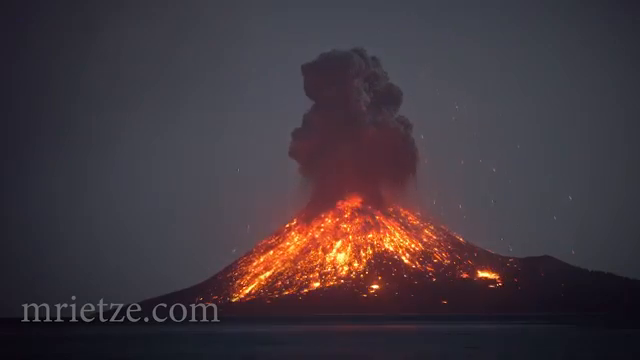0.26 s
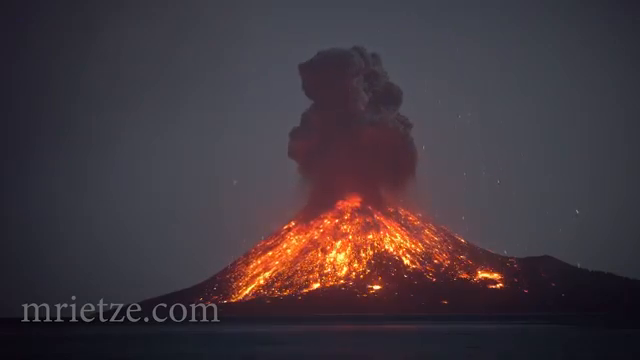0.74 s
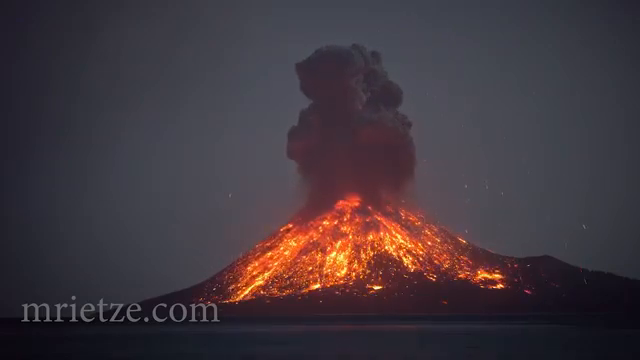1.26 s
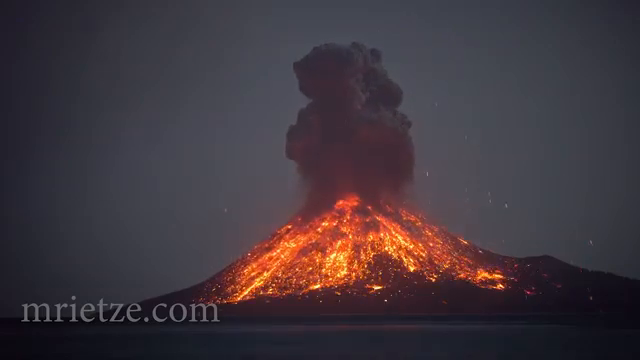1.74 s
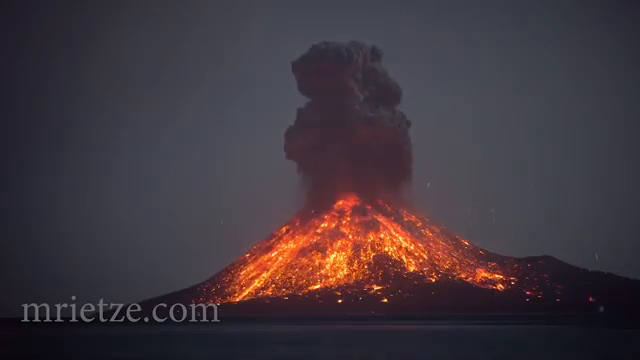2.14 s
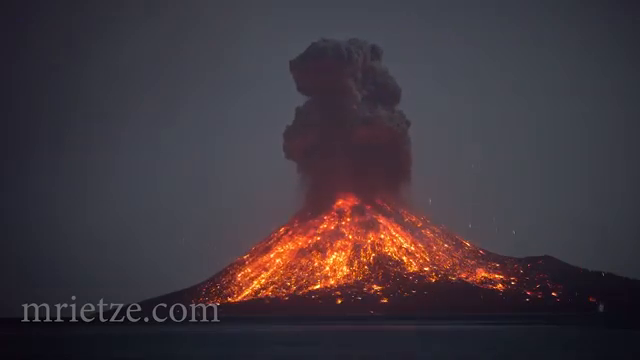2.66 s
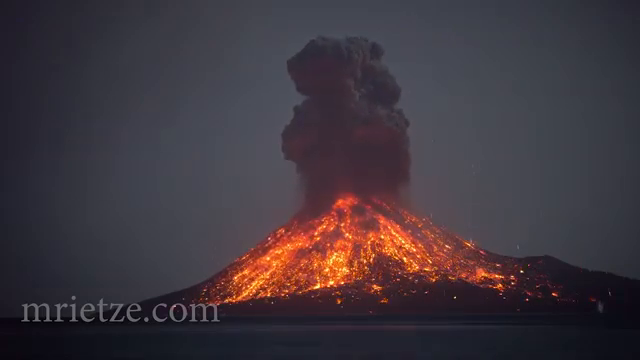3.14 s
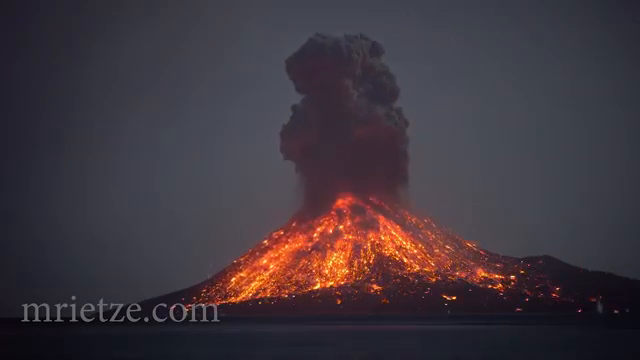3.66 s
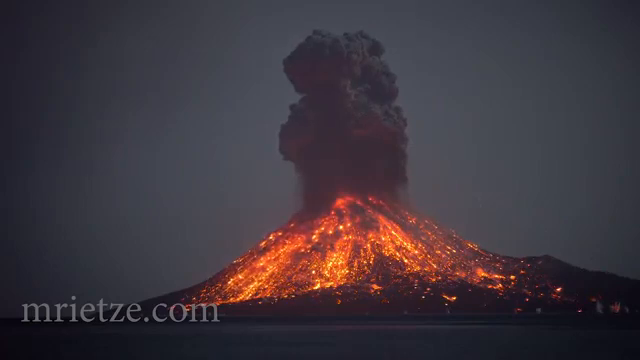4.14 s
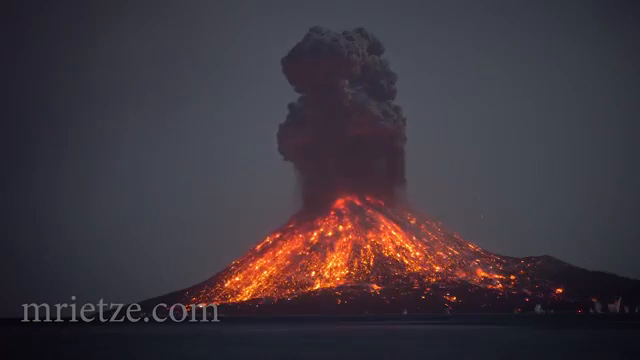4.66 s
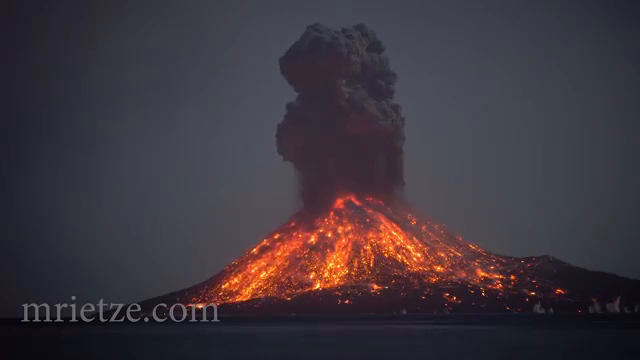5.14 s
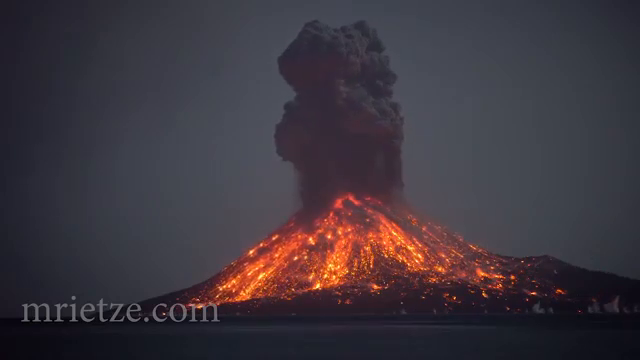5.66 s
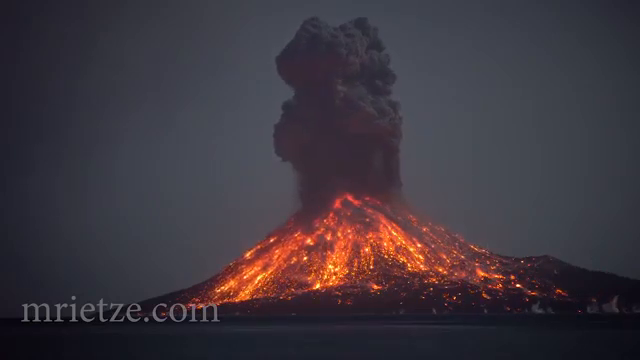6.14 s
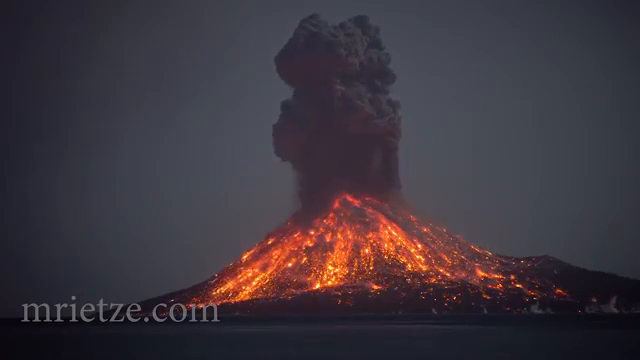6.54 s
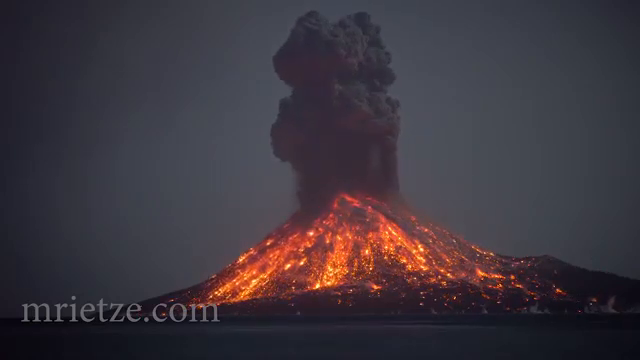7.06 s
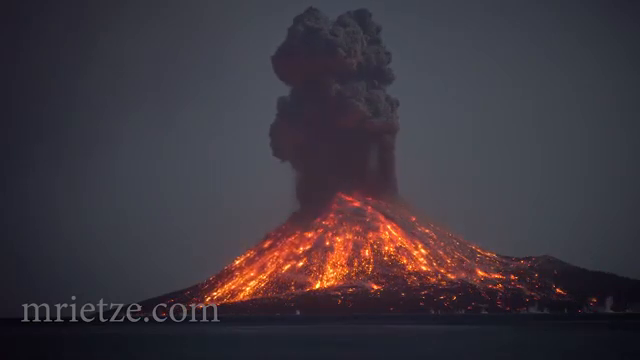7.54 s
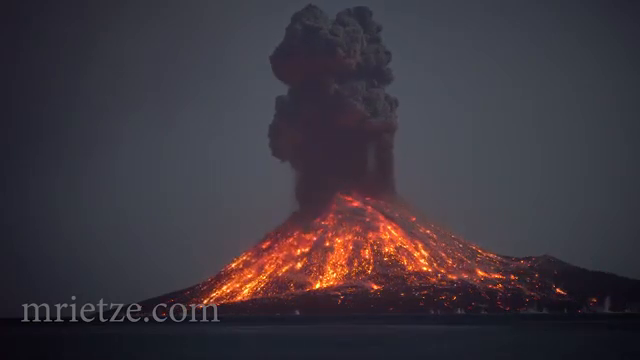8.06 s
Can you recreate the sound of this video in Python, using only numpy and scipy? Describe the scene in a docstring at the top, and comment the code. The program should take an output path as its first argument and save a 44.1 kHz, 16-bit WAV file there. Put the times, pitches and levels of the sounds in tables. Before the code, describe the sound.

A distant volcano erupts across a night bay, heard from the beach. From 0 s a deep, heaving rumble rolls under soft surf and faint hiss; muffled thumps punch through around 0.7-1 s. From about 0.4 to 4 s a cricket trills in quick, high, sinking groups with airy echoes, joined by single higher chirps near 1 and 4 s. At 2 s a huge boom strikes suddenly, blunt and chest-deep, with several rapid pressure thuds and a crackling upper roar; at 2.6 s nearly the same blast hits again, fading by 3.4 s. A small splash flicks at 3.3 s. The rumble stays lower as surf rises from 4 s, breaking with hollow roar, watery rush and fizzing foam. It swells around 6-7 s, briefly repeating its texture, eases near 7.4 s while low thumps sound, then surges again until the end at 8.3 s.

```python
"""Volcano across the bay.

Night on a shore facing an erupting volcano: filtered noise rolls over the water and swells into one great boom,
with pitched, fast-dying pushes as the strongest pressure fronts. Surf breaks and washes up the beach as grainy
noise bands on drawn level curves; two crickets chirp as short sinking tones with echoes, over a faint hiss.
Two short stretches of sound are heard twice."""
import sys
import numpy as np
from scipy import signal
from scipy.fft import rfft, irfft, next_fast_len
from scipy.io import wavfile
from scipy.ndimage import uniform_filter1d, minimum_filter1d, map_coordinates

SR = 44100
rng = np.random.default_rng(int(sys.argv[2]) if len(sys.argv) > 2 else 0)


def master_out(mix):
    """Clip the mix to full scale and print it as 16-bit PCM to the path in sys.argv[1]."""
    frames = np.transpose(np.atleast_2d(mix))
    ceiling = np.clip(frames, -1, 1)
    pcm = np.round(ceiling * 32767).astype(np.int16)
    wavfile.write(sys.argv[1], SR, pcm)


N = 365588  # length in samples


def amp(db):
    """Gain of a level in dB."""
    return 10 ** (np.asarray(db) / 20)


def unit(x):
    """x at rms 1."""
    return x / np.sqrt(np.mean(x ** 2) + 1e-20)


def noise():
    """White noise for the whole scene."""
    return rng.standard_normal(N)


def curves(table):
    """One value per sample for each column after the time."""
    seconds, *columns = np.transpose(table)
    return [np.interp(np.arange(N) / SR, seconds, column) for column in columns]


def wobble(rate):
    """A smooth random curve, rate knots a second (80 at most)."""
    knots = rng.standard_normal(N // 500)
    return map_coordinates(knots, [np.arange(N) * min(rate, 80) / SR])


def coloured(x, spectrum):
    """x through a spectrum drawn on a log frequency axis, at rms 1."""
    padded = next_fast_len(N + 8192)
    hz, db = np.transpose(spectrum)
    bins = np.fft.rfftfreq(padded, 1 / SR)
    gain = amp(np.interp(np.log(bins + 1), np.log(hz + 1), db))
    return unit(irfft(rfft(x, padded) * gain, padded)[:N])


def grainy(spread_db):
    """A dense hail of tiny impulses; the level scatters by spread_db from one 24-sample grain to the next."""
    sizes_db = spread_db * rng.standard_normal(N // 24 + 1)
    return noise() * amp(sizes_db.repeat(24)[:N])


def patchy(x, depth_db):
    """x with patches of random gain over time and frequency."""
    cells = signal.stft(x, nperseg=512)[2]
    field = uniform_filter1d(rng.standard_normal(cells.shape), size=8, axis=0)
    field = uniform_filter1d(field, size=10, axis=1)
    return signal.istft(cells * amp(depth_db * unit(field)), nperseg=512)[1][:N]


def add(track, s, sound):
    """Mix a sound into the track at s seconds."""
    track[round(s * SR):][:len(sound)] += sound


def volcano():
    """Countless far blasts smear into a roll and swell into a boom; the strongest fronts arrive singly."""
    return steady_roll() + great_boom() + pressure_fronts()


# The volcano's steady roll. Each row: time in seconds, deep level in dB, body level in dB.
ROLL_LEVELS = [(0, -29.5, -30.5), (.5, -26.5, -28.5), (.76, -19.5, -23.5), (1.29, -25, -29),
               (1.4, -22, -25.5), (1.65, -26, -29.5), (1.76, -20, -22.5), (2.0, -23, -26.5),
               (3.3, -26.5, -27.5), (3.63, -24, -26), (3.85, -28, -29.5), (4.5, -26.5, -27),
               (5.3, -24, -24.5), (5.6, -23, -30), (6.7, -22, -25), (7.2, -29, -34), (7.32, -21, -25),
               (7.6, -28, -28.5), (8.29, -28.5, -23)]
# Spectra of its deep, body and sharp top layers. Each row: frequency in Hz, density in dB per Hz.
DEEP_SPECTRUM = [(10, -34), (25, -9.5), (50, -6), (90, -1.5), (130, -0.5), (170, -8.5), (260, -120)]
BODY_SPECTRUM = [(80, -120), (120, -24), (160, -4), (230, -4.5), (320, -11.5), (400, -33.5), (600, -120)]
SHARP_SPECTRUM = [(180, -120), (260, -3), (320, -1), (380, 0.5), (450, -2), (620, -8), (800, -14.5),
                  (1200, -120)]  # also colours the boom's upper roar and the breakers' thud
EDGE_DB = -8  # top layer, over the body
HEAVE_DB, HEAVES_PER_S = 1, 7  # each layer heaves at random


def steady_roll():
    """Blasts too dense to tell apart add up to noise, in three bands that heave independently."""
    deep_db, body_db = curves(ROLL_LEVELS)
    layers = [(deep_db, DEEP_SPECTRUM), (body_db, BODY_SPECTRUM), (body_db + EDGE_DB, SHARP_SPECTRUM)]
    return sum(amp(db + HEAVE_DB * wobble(HEAVES_PER_S)) * coloured(noise(), spectrum)
               for db, spectrum in layers)


# The great boom. Each row: time in seconds, level in dB.
BOOM_LEVELS = [(2.02, -16), (2.042, -10), (2.18, -12.5), (2.252, -8), (2.432, -12), (2.476, -8.5),
               (2.55, -15), (2.6, -18.5), (3.04, -16), (3.3, -25.5), (3.4, -19)]
# Spectrum of the boom. Each row: frequency in Hz, density in dB per Hz.
BLAST_SPECTRUM = [(12, -42), (30, -10), (80, 1), (113, -7), (146, 1.5), (188, -8), (225, -3.5), (306, -16),
                  (380, -11.5), (424, -23), (619, -25.5), (690, -29), (1010, -34), (1500, -42), (1950, -96),
                  (3300, -120)]
CRACKLE_DB = -14  # upper roar, over the boom's level
CRACKLE_SPREAD_DB, CRACKLE_LUMPS_DB = 3.5, 2.5  # grain scatter; slower lumps
CRACK_DB, CRACK_DELAY_S, CRACK_PEAK_S = -24, .006, .008  # opening crack: peak level, start, rise


def great_boom():
    """A blast of low noise arrives suddenly, opens with a blunt crack and carries a crackling upper roar."""
    (boom_db,), clock = curves(BOOM_LEVELS), np.arange(N) / SR
    start, end = BOOM_LEVELS[0][0], BOOM_LEVELS[-1][0]
    gate = np.clip(np.minimum((clock - start) / 0.014, (end - clock) / 0.13), 0, 1)  # gentle end
    boom = gate * amp(boom_db) * coloured(amp(.9 * wobble(30)) * noise(), BLAST_SPECTRUM)
    u = np.maximum(clock - start - CRACK_DELAY_S, 0) / CRACK_PEAK_S
    crack = amp(CRACK_DB) * u * np.exp(1 - u)
    crackle = gate * amp(boom_db + CRACKLE_DB + CRACKLE_LUMPS_DB * wobble(20))
    return boom + (crackle + crack) * coloured(grainy(CRACKLE_SPREAD_DB), SHARP_SPECTRUM)


# The strongest pressure fronts. Each row: start in seconds, level in dB before the envelope, pitch in Hz.
FRONT_HITS = [(.73, -10, 120), (0.903, -7.5, 115), (0.936, -6.5, 114), (0.99, -6.5, 99), (2.023, 0, 95),
              (2.0442, -1, 99), (2.09, 3, 118), (2.173, -7, 101), (2.234, 1, 90), (2.297, 0.5, 115),
              (2.475, -8, 111), (2.496, -1, 69.5), (2.532, -2, 91.5), (3.12, -7, 109), (5.142, -11.5, 316),
              (7.3, -8, 55.5), (7.367, -7.5, 98), (7.961, -7, 350)]
RIPPLE = 0.08  # share of the brighter ripple on a front


def pressure_fronts():
    """Each front is a single push: a low tone with a very fast rise that dies within tens of milliseconds."""
    fronts, t = np.zeros(N), np.arange(SR // 10) / SR
    for s, db, hz in FRONT_HITS:
        phase = 2 * np.pi * hz * t
        push = np.sin(phase) + RIPPLE * np.sin(5.3 * phase)  # a steep front carries a brighter ripple
        rise = 1 - np.exp(-t / 0.0011)
        fall = amp(db - 60 * t / 0.072)  # 60 dB in 72 ms
        add(fronts, s, -fall * rise * push)
    return fronts


# The surf. Each row: time in seconds, hollow roar level in dB, rush level in dB, foam level in dB.
SURF_LEVELS = [(0, -38.5, -37, -37.5), (1, -42.5, -42, -39), (1.95, -44.5, -48.5, -38),
               (2.35, -40, -50, -41.5), (3.2, -41.5, -43, -43.5), (3.6, -34.5, -38, -40),
               (4.1, -33.5, -33, -38), (4.19, -31, -32, -32), (4.6, -24.5, -29.5, -28.5),
               (5.2, -23.5, -28, -30.5), (5.43, -28.5, -29.5, -32.5), (5.68, -26.5, -28, -32.5),
               (5.92, -24, -24, -28.5), (6.45, -21, -21, -27), (6.74, -20.5, -22, -28.5),
               (7.21, -23, -25.5, -33.5), (7.36, -26.5, -25.5, -35), (7.6, -24, -23.5, -30),
               (8.05, -18, -20, -25), (8.29, -16.5, -22.5, -27.5)]
# Spectra of trapped air, rush, wash and foam. Each row: frequency in Hz, density in dB per Hz.
HOLLOW_SPECTRUM = [(350, -120), (520, -11), (680, -4.5), (800, -1.5), (950, -1), (1150, -3), (1400, -35),
                   (2000, -120)]
RUSH_SPECTRUM = [(850, -120), (1200, -2.5), (1400, -3), (2000, -6.5), (2600, -12), (3500, -120)]
WASH_SPECTRUM = [(1180, -35), (2000, -5), (3000, -2.5), (6800, -15), (8840, -27), (15000, -120)]
FOAM_SPECTRUM = [(3240, -6), (5500, -7.5), (7580, -8.5), (8600, -5.5), (10200, -16), (13300, -19),
                 (14900, -25)]
WASH_DB, WASH_FOAM_SHARE = -0.47, 0.3  # the wash lies between rush and foam
# the breakers' thud: its level at this rush level, and how it follows the rush (dB per dB)
THUD_DB, THUD_RUSH_DB, THUD_GROWS = -28.5, -21, 0.62
# one small splash lifts the surf, the foam less
SPLASH_S, SPLASH_DB, SPLASH_RISE_S, SPLASH_FALL_S = 3.265, 6.5, 0.013, 0.023
SPLASH_FOAM_SHARE = .4


def surf():
    """Breakers thud, trapped air roars, water rushes over sand, foam bursts in fine grains."""
    since = np.arange(N) / SR - SPLASH_S
    splash_db = SPLASH_DB * np.exp(np.minimum(since / SPLASH_RISE_S, -since / SPLASH_FALL_S))
    hollow_db, rush_db, foam_db = curves(SURF_LEVELS)
    hollow_db = hollow_db + splash_db
    rush_db = rush_db + splash_db
    foam_db = foam_db + SPLASH_FOAM_SHARE * splash_db
    wash_db = WASH_DB + rush_db + WASH_FOAM_SHARE * (foam_db - rush_db)
    thud_db = THUD_DB + THUD_GROWS * (rush_db - THUD_RUSH_DB) + 2.54 * wobble(5)
    surge = .6 * wobble(6) + .4 * wobble(18)  # shared by all layers but the thud

    thud = amp(thud_db) * coloured(noise(), SHARP_SPECTRUM)
    hollow = amp(hollow_db + 0.84 * surge) * coloured(patchy(grainy(2.3), depth_db=1.0), HOLLOW_SPECTRUM)
    rush = amp(rush_db + 1.8 * surge) * coloured(patchy(grainy(1.1), depth_db=0.8), RUSH_SPECTRUM)
    wash = amp(wash_db + 0.32 * surge) * coloured(patchy(grainy(2.1), depth_db=0.6), WASH_SPECTRUM)
    foam = amp(foam_db + 0.53 * surge) * coloured(patchy(grainy(1.4), depth_db=0.75), FOAM_SPECTRUM)
    return thud + hollow + rush + wash + foam


def stroke(hz, fall_hz, length, bend):
    """One wing stroke: a tone that sinks as the wing slows."""
    u = np.arange(round(length * SR)) / (length * SR)
    pitch = hz - fall_hz * u ** bend
    swell = np.sin(np.pi * u) ** .6
    return swell * np.sin(2 * np.pi * np.cumsum(pitch) / SR)


# The low cricket's level curve. Each row: time in seconds, level in dB before each stroke's own offset.
TRILL_LEVELS = [(.4, -47), (1.85, -43), (2.6, -47.5), (3.05, -50), (4.0, -53)]
# The high cricket's single strokes. Each row: start in seconds, level in dB.
CHIRP_HITS = [(.908, -38), (1.13, -38), (3.795, -37), (4.021, -36)]
TRILL_START_S, TRILL_EVERY_S = .395, .2385  # first group of strokes, time to the next
TRILL_REST = 14  # the group left out, counted from 0


def crickets():
    """One cricket plays groups of three strokes among echoing trees, the other single higher ones close by."""
    far, near = np.zeros(N), np.zeros(N)
    beats = np.delete(TRILL_START_S + TRILL_EVERY_S * np.arange(16), TRILL_REST)
    for s, chance in zip(beats, rng.standard_normal((len(beats), 3))):
        db = np.interp(s, *np.transpose(TRILL_LEVELS))
        for k, offset_db in enumerate([2, 1.5, -7]):  # the third stroke is much weaker
            level = amp(db + offset_db + 1.5 * chance[k])
            add(far, s + .052 * k, level * stroke(6740, 210, .034, 1.2))
    for s, db in CHIRP_HITS:
        add(near, s, amp(db) * stroke(7410, 300, 0.036, 3.5))
    t = np.arange(SR // 2) / SR
    tail = amp(-60 * t / 1.1) * rng.standard_normal(len(t))  # decays at 60 dB per 1.1 s, half a second long
    sends = amp(-3) * far + amp(-8) * near
    echoes = signal.fftconvolve(sends, tail / np.linalg.norm(tail))[:N]
    return far + near + echoes


# Spectrum of the microphone hiss. Each row: frequency in Hz, density in dB per Hz.
HISS_SPECTRUM = [(2500, -120), (4000, -13), (5500, 0), (9000, -4), (14800, -7), (16000, -20)]


def microphone_hiss():
    """The microphone's faint steady noise."""
    return amp(-52.0) * coloured(noise(), HISS_SPECTRUM)


def scene():
    """Volcano, surf and crickets at one microphone, over its hiss."""
    return (volcano() + surf() + crickets() + microphone_hiss())[None]


# Stretches heard twice. Each row: source start in seconds, second start in seconds, length in seconds.
REPEATED_STRETCHES = [(1.96, 2.6, .44), (6.105, 6.745, .46)]
TOP_HZ = 15050  # band limit


def record(dry):
    """Peaks are limited, two stretches play again, and nothing stays above the band limit."""
    need = np.minimum(1, .97 / (np.abs(dry) + 1e-9))
    held = minimum_filter1d(need, size=1323)  # 30 ms window
    out = dry * uniform_filter1d(held, size=1323)
    for start, again, length in REPEATED_STRETCHES:
        steps = np.arange(round(length * SR))
        t = steps / SR
        blend = np.clip(np.minimum(t, length - t) / .003, 0, 1)  # short cross-fades at both ends
        old, new = round(start * SR) + steps, round(again * SR) + steps
        out[:, new] += blend * (out[:, old] - out[:, new])
    padded = next_fast_len(N + 8192)
    passed = np.fft.rfftfreq(padded, 1 / SR) < TOP_HZ
    return irfft(rfft(out, padded) * passed, padded)[:, :N]


dry = scene()
out = record(dry)
master_out(out)
```